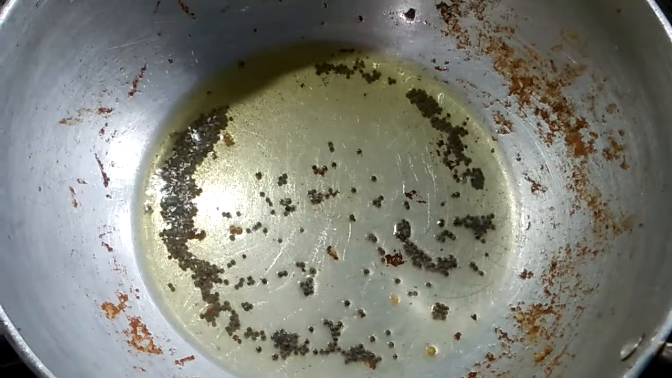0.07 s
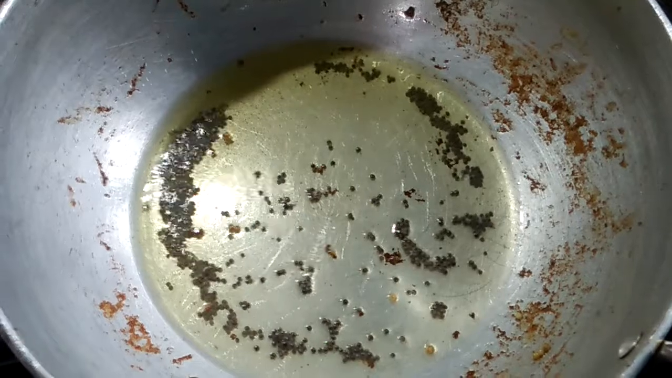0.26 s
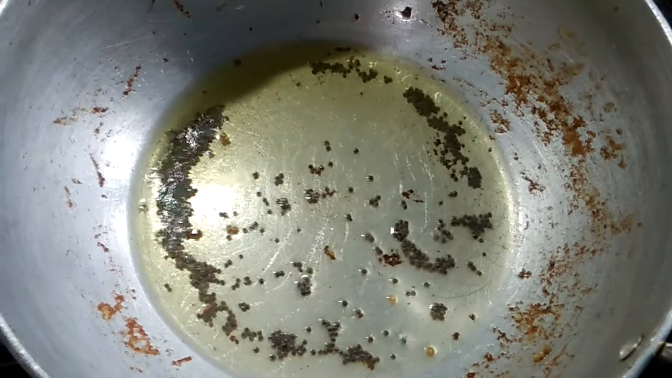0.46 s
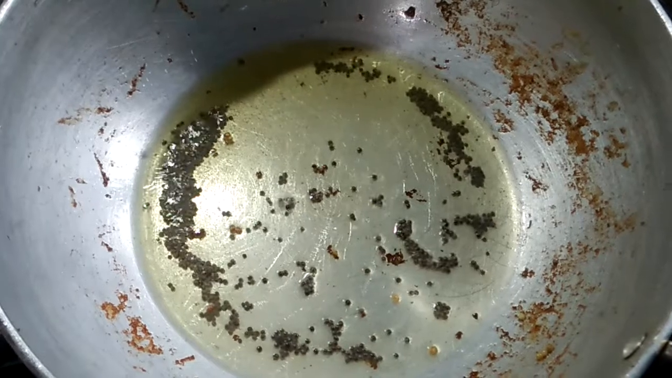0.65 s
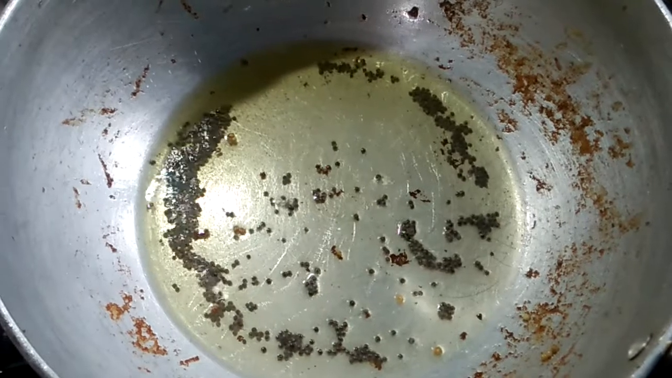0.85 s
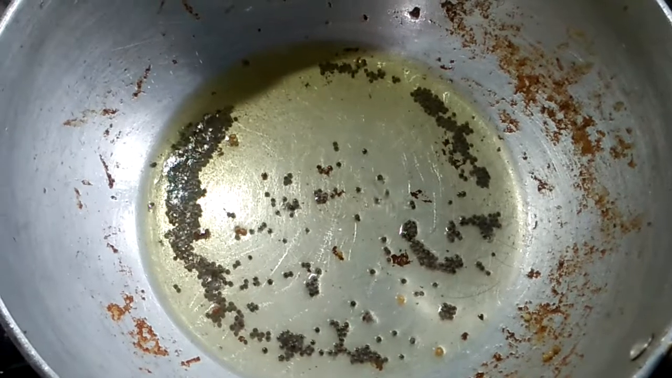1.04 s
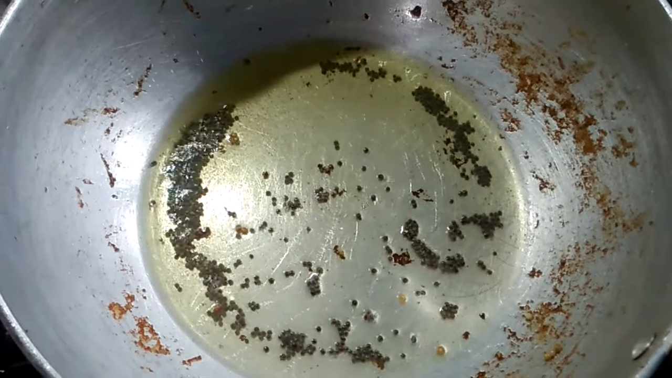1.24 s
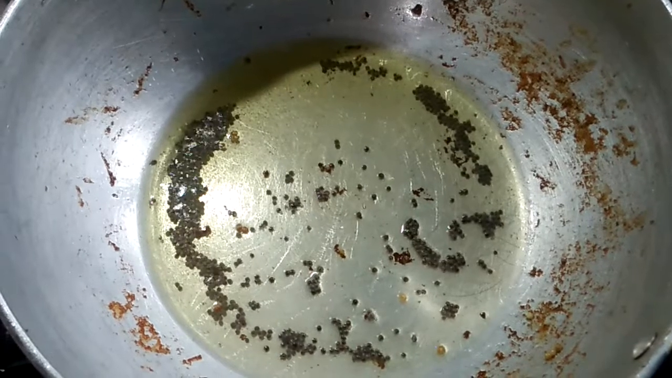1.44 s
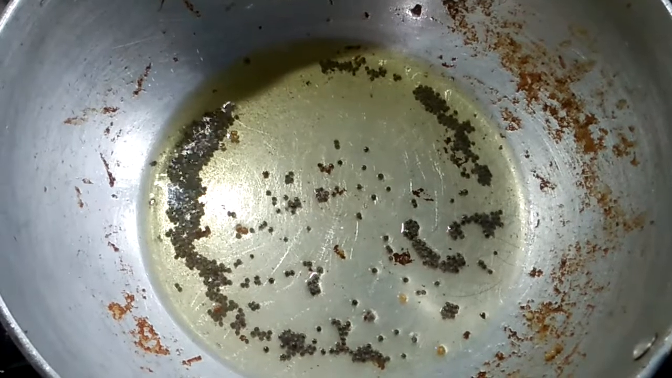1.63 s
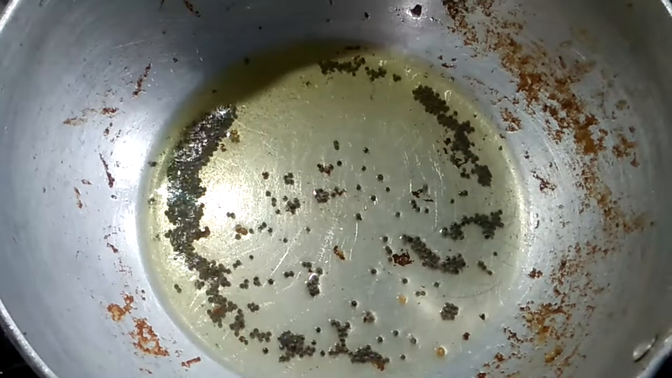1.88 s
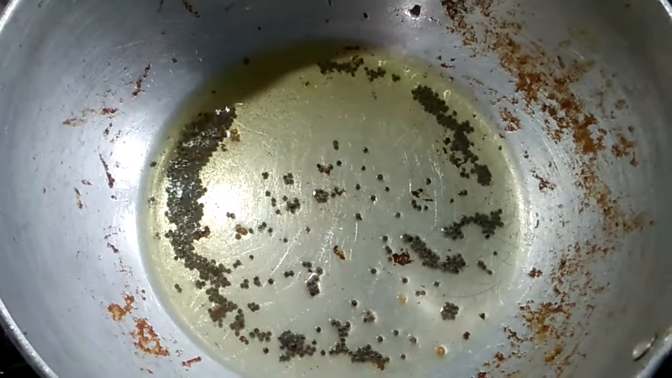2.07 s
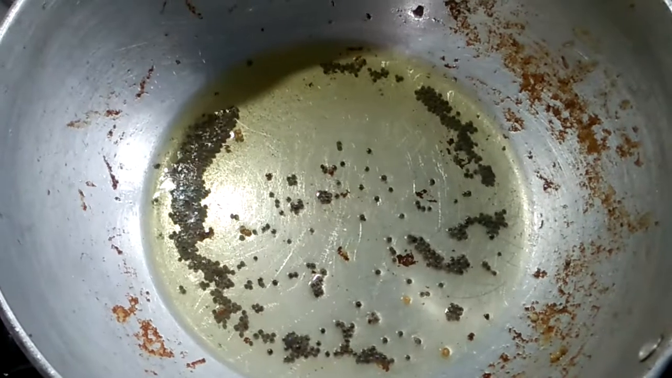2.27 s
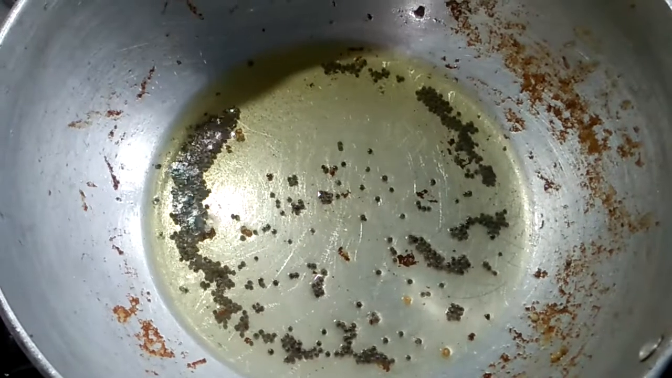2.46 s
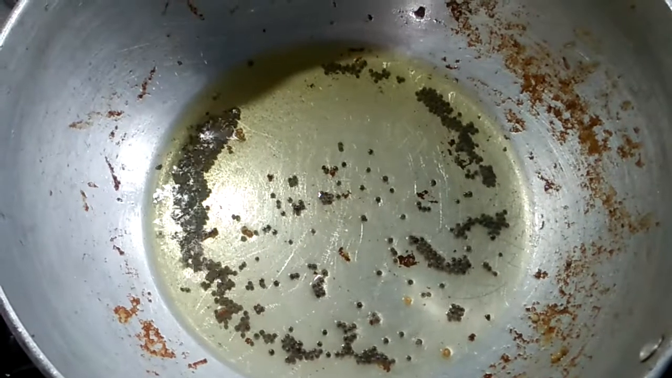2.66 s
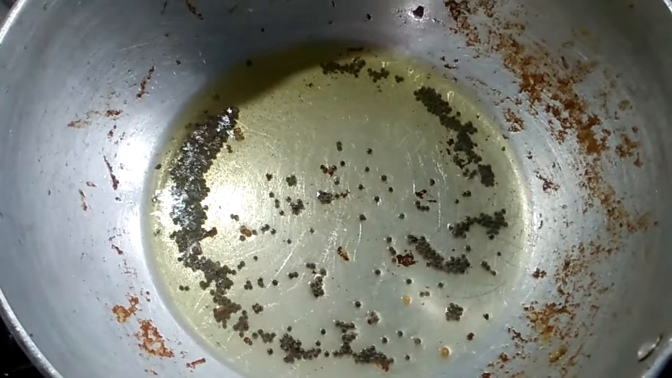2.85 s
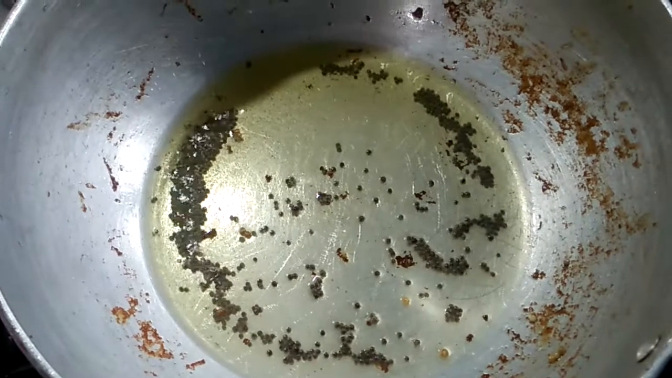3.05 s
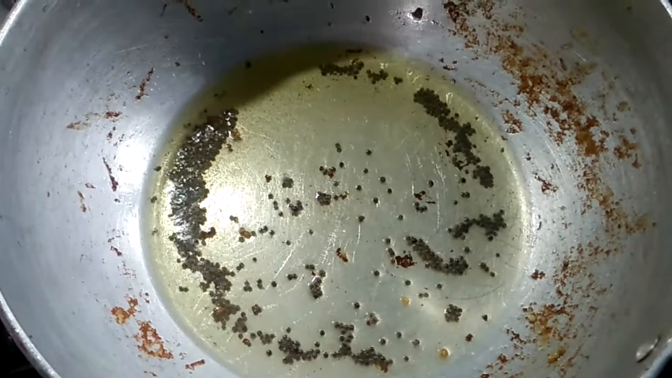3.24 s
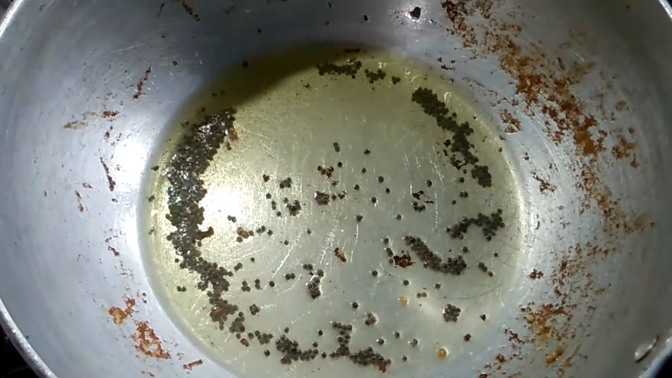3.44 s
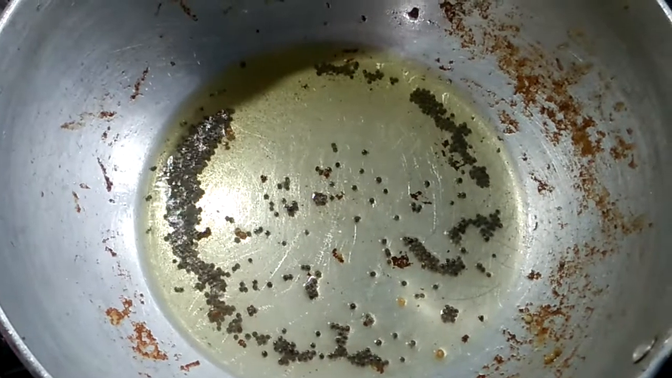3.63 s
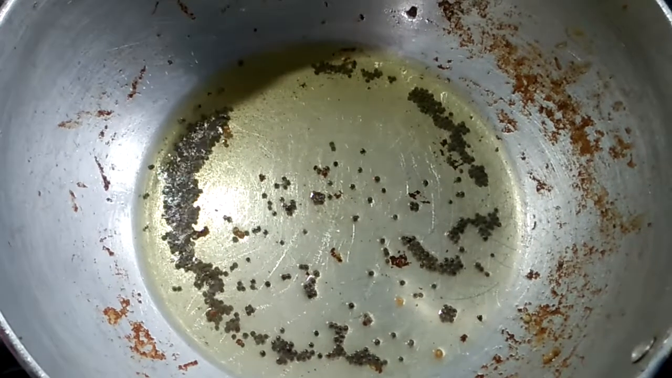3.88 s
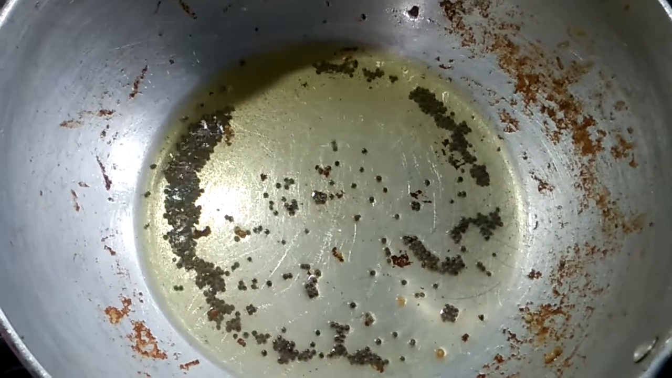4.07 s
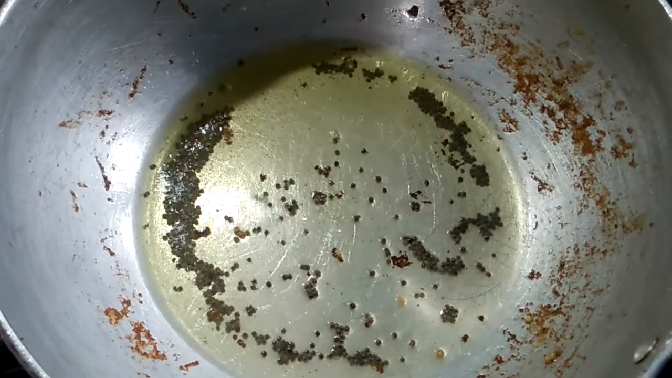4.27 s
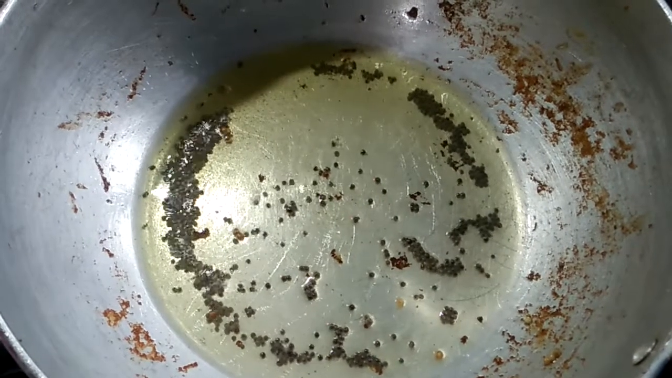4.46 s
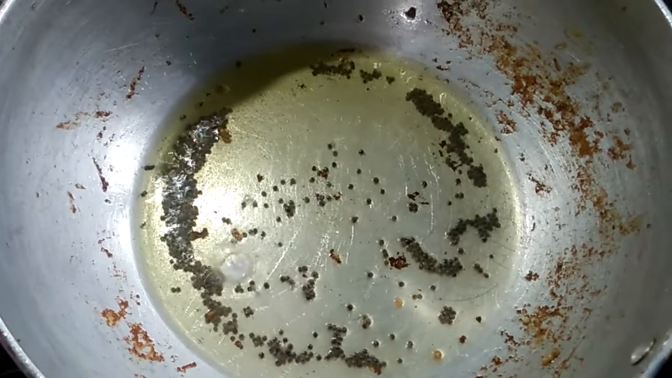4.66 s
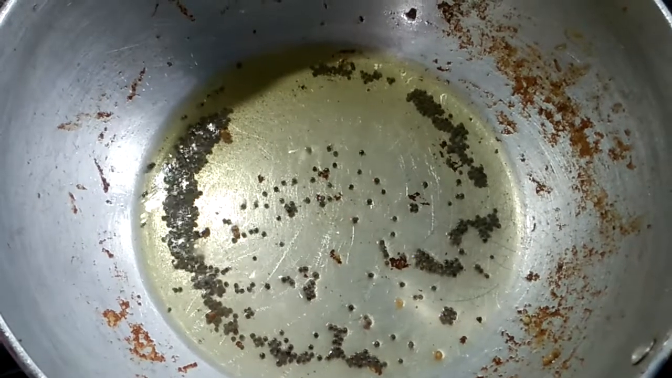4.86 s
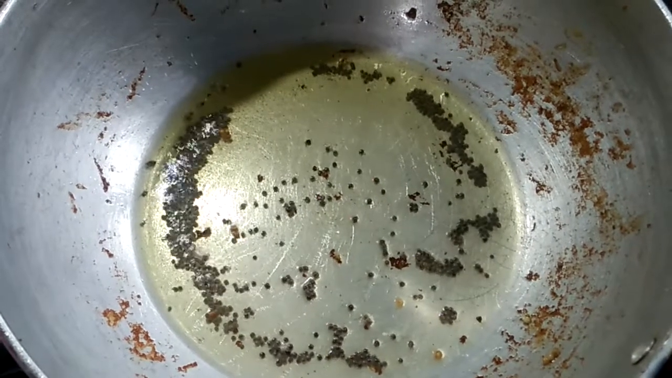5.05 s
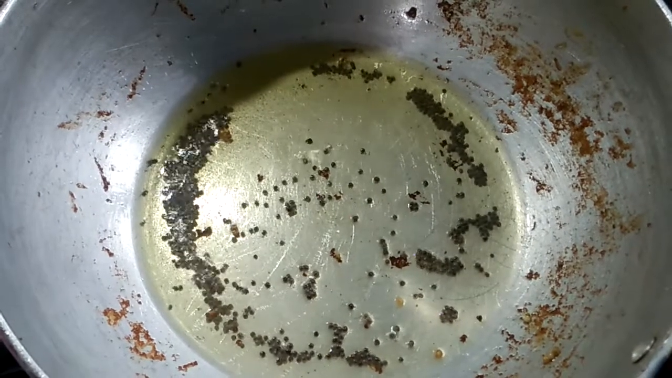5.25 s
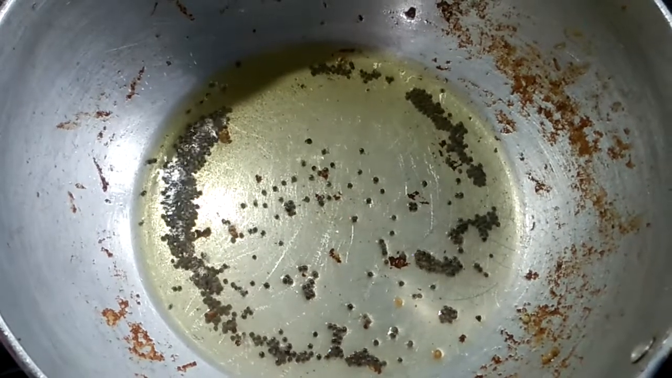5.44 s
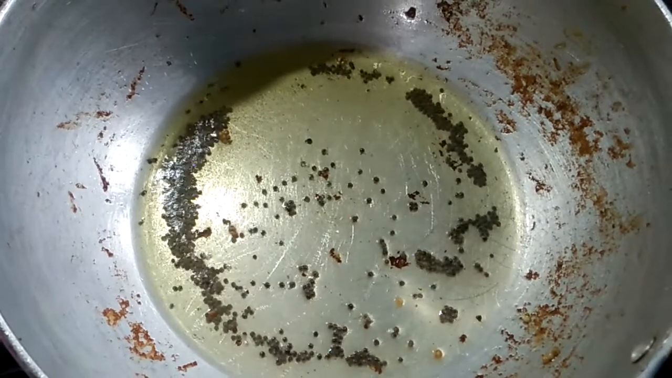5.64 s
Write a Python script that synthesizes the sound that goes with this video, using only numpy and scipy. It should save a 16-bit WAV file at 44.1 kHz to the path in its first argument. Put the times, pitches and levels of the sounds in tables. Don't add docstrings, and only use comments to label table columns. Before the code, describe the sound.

Irregular crisp pops and crackles of seeds spluttering in a steel pan of oil, with small steam spits and a faint fizz beneath.

```python
import sys
import numpy as np
from scipy import signal
from scipy.fft import rfft, irfft, next_fast_len
from scipy.io import wavfile
from scipy.ndimage import uniform_filter1d

SR = 44100
rng = np.random.default_rng(int(sys.argv[2]) if len(sys.argv) > 2 else 0)


def generate_wav(signal):
    frames = np.transpose(np.atleast_2d(signal))
    scaled = np.clip(frames, -1, 1) * 32767
    pcm = np.round(scaled).astype(np.int16)
    wavfile.write(sys.argv[1], SR, pcm)


def amplitude_ratio(level_db):
    exponent = np.asarray(level_db, float) / 20
    return 10 ** exponent


N = 251722
TIME = np.arange(N) / SR

# start in seconds, peak above 8 kHz in dB, then the shares of thump and of edge
# and the strength of the room, all in dB.
CRACKS = [(0.0667, -33.5, -46, -20, 6), (0.3077, -26.5, -31.5, -17, 0.5), (0.6547, -24, -17.5, -9.5, 0),
          (0.784, -24.5, -30.5, -15, 8), (0.8062, -18, -27.5, -20.5, -2.5), (1.078, -34.5, -27, -21, 5.5),
          (1.1706, -19.5, -34, -21.5, -1.5), (1.9177, -18, -24, -11, 3), (2.4461, -12, -26.5, -16.5, 5),
          (2.7327, -33, -48, -18.5, 3), (3.185, -36, -22.5, -21, 5), (3.6415, -27.5, -34.5, -21.5, 9),
          (4.363, -26.5, -29, -18.5, 3.5), (4.5352, -28, -28, -4.5, -3), (4.572, -18, -27, -15, 0),
          (4.7141, -13.5, -32, -19, -3), (4.7985, -6.5, -27, -16, 0.5), (4.9365, -11, -31.5, -15, -2.5),
          (5.2227, -19, -27, -11.5, -2), (5.4818, -38.5, -20.5, -16.5, 9), (5.672, -33, -20, -16.5, 4)]


def rms_one(x):
    return x / np.sqrt(np.mean(x ** 2, axis=-1, keepdims=True) + 1e-20)


def band(x, low_hz, high_hz, order=2):
    limits = [low_hz, min(high_hz, .45 * SR)]
    return signal.sosfilt(signal.butter(order, limits, "band", fs=SR, output="sos"), x)


def resonance(x, hz, width_hz):
    r = np.exp(-np.pi * width_hz / SR)
    turn = 2 * np.pi * hz / SR
    return signal.lfilter([(1 - r * r) / 2, 0, (r * r - 1) / 2], [1, -2 * r * np.cos(turn), r * r], x)


def ring(blows, hz, t60):
    r = amplitude_ratio(-60 / (t60 * SR))
    turn = 2 * np.pi * hz / SR
    return signal.lfilter([0, np.sin(turn)], [1, -2 * r * np.cos(turn), r * r], blows + 1e-18)


def fade(x, t60):
    return signal.lfilter([1], [1, -amplitude_ratio(-60 / (t60 * SR))], x + 1e-18)


def train(s, level_db):
    out = np.zeros(N + SR)
    np.add.at(out, (np.asarray(s) * SR).astype(int), amplitude_ratio(np.asarray(level_db)))
    return out[:N]


def drift(rate):
    knots = np.arange(0, N / SR + 1, 1 / rate)
    return np.interp(TIME, knots, np.clip(rng.standard_normal(len(knots)), -2, 2))


def shaped(spectrum, patchy_db, channels=2, count=9):
    hz, level_db = np.transpose(spectrum)
    edges = np.geomspace(hz[0], min(hz[-1], .45 * SR), num=count)
    white = rng.standard_normal((2, channels, N))
    out = 0
    for k, (low, high) in enumerate(zip(edges, edges[1:])):
        gain_db = np.interp(np.log(low * high) / 2, np.log(hz), level_db)
        out = out + amplitude_ratio(gain_db + patchy_db * drift(8.0)) * band(white[k % 2], low, high)
    return rms_one(out)


def humming(peaks, patchy_db):
    white = rng.standard_normal(N)
    out = 0
    for hz, width_hz, level_db in peaks:
        tone = resonance(resonance(white, hz, width_hz), hz, width_hz)
        out = out + amplitude_ratio(level_db + patchy_db * drift(9)) * rms_one(tone)
    return rms_one(out)


def gate():
    # start in seconds, fizz level in dB, hold in seconds, closing speed in dB per second.
    openings = [(0.0, -57, .005, 89), (0.064, -60, .005, 50), (0.307, -60.5, .005, 63),
                (.542, -64, .005, 114), (0.662, -63, .2, 28), (1.168, -59.5, .03, 77),
                (1.436, -64, 0.066, 106), (1.807, -66.5, .005, 33), (1.913, -62, .06, 117),
                (2.292, -66.5, .2, 22), (2.536, -62, .3, 8), (3.184, -63, .3, 16),
                (3.638, -60.5, 0.094, 109), (3.95, -79, .06, 99.5), (4.216, -63, .2, 8.5),
                (4.36, -59.5, .2, 18), (4.704, -57.5, .1, 26), (4.8, -59, 0.51, 27),
                (5.476, -63, .03, 43.5), (5.669, -64, .04, 52)]
    shut_floor_db = -86.5
    rows = np.array(sorted(openings))
    newest = np.maximum(np.searchsorted(rows[:, 0], TIME, side="right") - 1, 0)
    s, open_db, hold, closing = rows[newest].T
    return np.maximum(open_db - closing * np.maximum(TIME - s - hold, 0), shut_floor_db)


def fizz():
    # pitch in Hz, level in dB per Hz.
    hiss = [(1760, -28), (3000, -7.5), (5180, -5.5), (7100, -0.5), (10500, -3.5), (13700, -8.5),
            (14700, -8), (15000, -45)]
    born = rng.random(N) < 260 * amplitude_ratio(5 * drift(5)) / SR
    sizes = amplitude_ratio(3.5 * np.minimum(rng.exponential(1, N), 4)) * rng.choice([-1, 1], N)
    bubbles = rms_one(band(born * sizes + 1e-18, 5800, 26000))
    return shaped(hiss, patchy_db=2.8, count=17) + amplitude_ratio(-7) * bubbles * [[1], [0]]


def steam_whistle():
    # pitch in Hz, width in Hz, level in dB.
    gaps = [(6760, 48, -6.5), (7700, 95, -8.5), (9250, 150, -2.5), (11360, 88, -4.5), (12400, 60, -15.5),
            (5500, 90, -6.5), (8130, 70, -0.5), (11700, 58, -3.5), (13500, 130, -3), (3410, 90, -4)]
    return humming(gaps, patchy_db=5)


def burner(shut_db):
    # pitch in Hz, level in dB per Hz.
    roar = [(130, -47), (220, -16), (243, -9.5), (526, -9), (694, -2.5), (1700, -3.5), (2420, -9),
            (3160, -3), (4500, -25.5), (5850, -19), (9900, -120)]
    # pitch in Hz, width in Hz, level in dB.
    whistle = [(2390, 110, -9), (2600, 250, -6.5), (2430, 560, -9.5), (1187, 25, -16)]
    # time in seconds, level in dB.
    flame_size = [(0.0, -78), (0.3, -66.5), (0.5, -68.5), (0.83, -65), (1.1, -67), (1.5, -76), (1.85, -71),
                  (2.15, -82), (2.34, -89), (2.52, -60), (2.65, -63), (2.85, -64.5), (3.2, -64.5),
                  (3.86, -57.5), (4.08, -76), (4.6, -55.5), (4.77, -80), (4.9, -58.5), (5.71, -65)]
    size_db = np.interp(TIME, *np.transpose(flame_size))
    flame_db = -68.5 + 0.017 * (size_db - size_db.mean()) + 0.099 * (shut_db - shut_db.mean())
    whistle_db = size_db + 0.11 * shut_db
    out = amplitude_ratio(flame_db) * shaped(roar, patchy_db=3.5, channels=1)[0]
    return out + amplitude_ratio(whistle_db - 3.5) * humming(whistle, patchy_db=3)


def rumble():
    # pitch in Hz, width in Hz, level in dB.
    rumble_tones = [(57.8, 37, 0.5), (97, 20.7, 1.5), (115.8, 16, -5), (140.5, 60, -11.5), (71.5, 42, -14)]
    # pitch in Hz, width in Hz, level in dB.
    drone_tones = [(167.9, 14.5, -4), (190.3, 6, -5.5)]
    # middle in seconds, rumble in dB, drone in dB, half length in seconds.
    swells = [(0.0, -61.5, -64, 0.047), (0.206, -59, -78, 0.086), (0.46, -66, -84, 0.13),
              (1.06, -68.5, -82.5, 0.38), (1.75, -64, -81.5, 0.11), (2.017, -64, -77, 0.13),
              (2.34, -67.5, -75, 0.15), (2.786, -69, -69, 0.2), (3.037, -60, -67, 0.056),
              (3.153, -74, -67.5, 0.057), (3.49, -68, -68, 0.14), (3.71, -58, -80, 0.16),
              (4.041, -64.5, -75, 0.095), (4.37, -71, -71.5, 0.09), (4.552, -62, -92, 0.051),
              (4.712, -66, -95, .04), (4.84, -65.5, -77, 0.17), (5.26, -74.5, -79, 0.11),
              (5.543, -65.5, -92, 0.09)]
    s, rumble_db, drone_db, half = np.transpose(swells)
    bells = np.exp(-((TIME - s[:, None]) / half[:, None]) ** 2)
    rumble_gain = amplitude_ratio(-85.5) + amplitude_ratio(rumble_db) @ bells
    drone_gain = amplitude_ratio(-90.5) + amplitude_ratio(drone_db) @ bells
    return rumble_gain * humming(rumble_tones, patchy_db=5.0) + drone_gain * humming(drone_tones, patchy_db=2.5)


def bursts():
    # start in seconds, peak above 8 kHz, share of thump, share of edge, all in dB.
    ticks = [(0.542, -45.5, -15, -9.5), (0.911, -52, -14, 1.5), (2.292, -52, -49.5, -9),
             (2.3, -47.5, -10, -4), (2.7789, -50, -24, 4.5), (2.91, -43, -37, -32), (3.3674, -42, -33, -27),
             (4.2228, -42, -17.5, -1.5), (4.6615, -35, -53, -19), (5.1771, -39, -39, -15),
             (5.198, -38, -39, -22)]
    # start in seconds, peak above 8 kHz, thump, edge, all in dB.
    blurts = [
        (0.7047, -38.5, -9.5, -17),
        (1.8096, -58.5, -0.5, 3.5),
        (2.6246, -45.5, -8.5, 4),
        (4.752, -47, 3, -16),
    ]
    dry_body_db, dull_body_db = -2.5, 8
    tick_room_db, dull_room_db = -3.5, 2.5
    rows = [(*row, dry_body_db) for row in CRACKS]
    rows += [(*row, tick_room_db, dry_body_db) for row in ticks]
    rows += [(*row, dull_room_db, dull_body_db) for row in blurts]
    s, peak_db, thump_db, edge_db, room_db, lift_db = np.transpose(sorted(rows))
    s = s + .0012
    body_db = (thump_db + edge_db) / 2 + lift_db
    return s, peak_db, thump_db, body_db, edge_db, room_db


def cracks():
    # low Hz, high Hz, click in dB, tail in dB, early and late fading time (t60) in seconds.
    crack_bands = [
        (582, 1703, 19.5, -11, 0.13, 0.79),
        (1393, 4140, 13, -8.5, 0.18, 0.66),
        (3630, 8920, 13, -9.5, 0.12, 0.49),
        (8120, 13200, 21, -13, 0.17, 0.52),
        (12720, 16500, 19, -16, 0.12, 0.5),
    ]
    # delay in seconds, level in dB.
    echo_paths = [
        (.0023, -13),
        (.0045, -20),
    ]
    # time in seconds, peak above 8 kHz in dB.
    slaps = [(0.315, -33), (0.665, -41), (0.7927, -40), (0.8144, -23), (1.176, -33), (1.9285, -27),
             (2.306, -69), (2.4544, -17), (2.7425, -41), (3.1934, -48), (4.23, -47), (4.3714, -26),
             (4.544, -29), (4.7224, -25), (4.8087, -13), (4.9462, -17), (5.2305, -22), (5.68, -57),
             (3.6505, -30), (4.5803, -27), (5.2075, -44), (4.9485, -25), (2.4575, -19), (5.5, -53)]
    smeared, sharp, smear_s = .24, .14, .004
    s, peak_db, *shares_db, room_db = bursts()
    shares_db += [np.full(len(s), -15), np.full(len(s), -14.5)]
    luck = rng.standard_normal((len(s), 4))
    slap_s, slap_db = np.transpose(slaps)
    parent = np.searchsorted(s, slap_s - .004) - 1
    direct, tail = np.zeros(N), np.zeros((2, N))
    unit = signal.unit_impulse(2000)
    rough, white = rng.choice([-1, 1], N), rng.standard_normal((2, N))
    for (low, high, click_db, tail_db, early, late), share_db in zip(crack_bands, shares_db):
        level_db = peak_db + share_db
        echoes = train(slap_s + 0.00074, slap_db + share_db[parent] - 3.5)
        for k, (lag, echo_db) in enumerate(echo_paths):
            arrival = s + lag * (1 + 0.18 * luck[:, k])
            echoes += train(arrival, level_db + echo_db + room_db + 3 * luck[:, k + 2])
        echoes = smeared * fade(echoes, smear_s * 3) * rough - sharp * echoes
        clicks = band(train(s, level_db) + echoes + 1e-18, low, high, order=3)
        direct += amplitude_ratio(click_db) * clicks / np.linalg.norm(band(unit, low, high, order=3))
        fed = train(s + 0.00014, level_db + tail_db + room_db)
        swell = fade(fed, early) + amplitude_ratio(-13.5) * fade(fed, late)
        tail += swell * rms_one(band(white, low, high, order=3))
    return direct, tail


def pan_ring():
    # pitch in Hz, level in dB, fading time (t60) in seconds.
    pan_tones = [(953, -12.5, 0.33), (694, -17, 0.3)]
    s, peak_db, thump_db, *_ = bursts()
    return sum(ring(train(s, peak_db + thump_db + level_db), hz, t60) for hz, level_db, t60 in pan_tones)


def jets():
    # start in seconds, peak in dB, pitch in Hz, fading time (t60) in seconds.
    sudden_spits = [(0.2, -50.5, 2730, 0.25), (0.6629, -27.5, 3000, 0.09), (0.7066, -26.5, 1943, 0.18),
                    (0.7062, -28.5, 2780, 0.19), (0.923, -41, 3020, 0.088), (1.4405, -41, 1640, 0.1),
                    (1.8121, -33.5, 3790, 0.17), (2.545, -35.5, 2850, 0.18), (2.6259, -20, 2860, 0.2),
                    (2.628, -32.5, 3760, 0.24), (2.6, -47, 2800, 0.12), (3.3, -45, 3660, 0.1),
                    (4.289, -49.5, 3130, 0.24), (4.7531, -28, 2520, 0.19), (5.4825, -42.5, 2660, 0.29),
                    (5, -47, 4430, 0.1), (4.502, -45, 4600, 0.14), (5.434, -39.5, 4900, 0.099),
                    (4.537, -32.5, 5300, 0.12), (0.657, -33.5, 3850, 0.19)]
    sprays = [(0.0676, -30.5, 4670, 0.17), (1.0764, -33.5, 5580, 0.14), (2.308, -42, 580, 0.1),
              (2.545, -43, 4670, 0.25), (4.3, -57, 450, .5), (4.5437, -41, 4560, 0.091),
              (5.429, -47.5, 6500, .1), (1.4406, -63, 8860, 0.23), (5.675, -37.5, 8500, 0.36),
              (2.371, -51, 1450, .6), (2.381, -53, 850, .5), (2.436, -45, 800, .1)]
    leaks = [(1.4385, -36, 6820, 0.25), (1.443, -41, 9800, 0.33), (1.4411, -52, 13000, 0.42),
             (2.962, -37.5, 7700, 0.14), (2.97, -45, 9300, .25), (2.97, -47.5, 12400, 0.25),
             (3.37, -50, 12500, 0.25), (3.448, -53, 410, 0.27), (4.469, -48, 13500, 0.22),
             (5.04, -46, 9600, .15), (2.9, -45.5, 13000, 0.18)]
    moans = [(1.391, -53, 325, .28), (3.931, -56, 1720, .47), (3.921, -56.5, 1070, .73),
             (3.111, -49, 2366, .3), (3.501, -52, 2386, .4), (3.731, -47, 2366, .4), (3.901, -52, 2381, .4),
             (3.801, -51, 2731, .25), (3.941, -51, 2681, .3), (3.421, -54, 2701, .3),
             (0.781, -56.5, 2000, 1.8), (4.299, -52, 830, .22)]
    squeals = [
        (2.312, -53.5, 1880, 0.67),
        (2.362, -37.5, 1940, 0.19),
        (2.378, -44, 1170, 0.5),
        (2.386, -38, 2080, .15),
        (2.398, -37.5, 2010, 0.2),
        (2.418, -33, 2060, 0.1),
        (2.431, -38.5, 1985, 0.13),
        (1.41, -57.5, 1590, 1),
        (2.64, -40.5, 5700, 0.15),
    ]
    peeps = [(1.761, -49, 4461, .2), (1.763, -53, 2901, .2), (1.763, -55, 5351, .2),
             (1.813, -52, 5501, .25), (0.1781, -39, 2401, .12), (0.1891, -35, 3001, .08),
             (2.773, -42, 2561, .1), (2.787, -41, 2901, .1), (2.391, -47, 2701, .2),
             (2.421, -54, 2901, .15), (2.399, -33, 2061, .3), (2.363, -39, 2001, .06)]
    # width as share of the pitch, rise in seconds, knock in dB, lingering part in dB.
    kinds = [
        (0.25, 0.00174, -6, -14.5),
        (0.44, 0.00037, -13, -16),
        (0.19, 0.021, -45, -18),
        (0.051, 0.027, -45, -12),
        (.2, 0.0043, -49, -13.5),
        (0.071, .003, -49.5, -15),
    ]
    out = np.zeros((2, N + SR))
    t = TIME[:SR // 4]
    unit = signal.unit_impulse(800)
    ending = np.cos(np.clip(t / t[-1] * 2 - 1, 0, 1) * np.pi / 2) ** 2
    groups = [sudden_spits, sprays, leaks, moans, squeals, peeps]
    for rows, (share, rise, knock_db, late_db) in zip(groups, kinds):
        for s, peak_db, hz, t60 in rows:
            half_width = share * hz / 2
            gusts = np.repeat(rng.standard_normal(len(t) // 100 + 1), 100)[:len(t)]
            puffs = rng.standard_normal((2, len(t))) * amplitude_ratio(2.15 * gusts)
            jet = rms_one(band(puffs, max(hz - half_width, 50), hz + half_width, order=4))
            fall = amplitude_ratio(-75 * t / t60) + amplitude_ratio(late_db - 28 * t / t60)
            shape = np.minimum(t / max(rise, 1e-4), 1) * fall * ending
            knock = band(unit, .65 * hz, 1.15 * hz)
            at = int(s * SR)
            out[:, at:at + len(t)] += amplitude_ratio(peak_db - 10.5) * jet * shape
            out[0, at:at + len(unit)] += amplitude_ratio(peak_db + knock_db) * knock / np.max(np.abs(knock))
    return out[:, :N]


def plops():
    # start in seconds, level in dB, pitch in Hz, fading time (t60) in seconds.
    bubble_rings = [(0.7056, -20, 1850, .014), (0.7056, -24, 2450, .016), (0.7056, -29, 1200, .014),
                    (0.7181, -33, 2951, .03), (4.7526, -32, 2151, .02), (4.7556, -36, 2651, .03),
                    (0.0679, -34, 5201, .01), (0.0703, -33, 4301, .012), (1.0776, -38, 5301, .012),
                    (2.4476, -28, 1301, .02), (2.3151, -45, 561, .04), (2.6256, -29, 2701, .015),
                    (0.6581, -32, 3001, .01)]
    out, unit = np.zeros(N), signal.unit_impulse(2000)
    for s, level_db, hz, t60 in bubble_rings:
        at = int(s * SR)
        out[at:at + len(unit)] += amplitude_ratio(level_db) * band(ring(unit, hz, t60), .65 * hz, 1.4 * hz)
    return out


def pings():
    # start in seconds, level in dB, pitch in Hz, fading time (t60) in seconds.
    strikes = [
        (4.947, -52, 4221, .5),
        (4.947, -53, 4260, .3),
        (4.947, -56, 3553, .32),
        (4.947, -45, 3838, .13),
        (1.927, -48, 5206, .15),
        (1.927, -52, 4011, .24),
        (1.927, -52, 2083, .2),
        (1.18, -56, 2740, .25),
        (4.862, -46, 2950, .08),
    ]
    return sum(ring(train([s], [level_db + 0.28]), hz, t60) for s, level_db, hz, t60 in strikes)


def width(diffuse):
    hush_s = .026
    starts = np.array(CRACKS)[:, 0]
    middles = train(np.maximum(starts + .005 - hush_s / 2, 0), np.zeros(len(starts)))
    heard = diffuse * (uniform_filter1d(middles, size=int(hush_s * SR)) < 1e-6)
    edges = np.geomspace(6700, 13500, num=7)
    out = 0
    for low, high in zip(edges, edges[1:]):
        patch_open = np.clip(3 * (drift(22) + .35), 0, 1)
        out = out + patch_open * band(heard, low, high, order=3)
    return amplitude_ratio(-2.5) * out


def scene():
    fizz_db = gate()
    shut_db = uniform_filter1d(fizz_db, size=2000) - fizz_db.max()
    floor = amplitude_ratio(fizz_db - 11.0) * steam_whistle() + burner(shut_db) + rumble()
    clicks, tail = cracks()
    direct = clicks + pan_ring() + plops() + pings()
    diffuse = tail + jets() + amplitude_ratio(fizz_db - 4.5) * fizz()
    mid = direct + diffuse[0] + floor
    side = width(diffuse[1])
    return np.array([mid + side, mid - side])


def low_pass(x):
    return signal.sosfilt(signal.butter(12, 16650, fs=SR, output="sos"), x)


def record(dry):
    bright = dry + 1.23 * resonance(dry, 15660, 3100)
    size = next_fast_len(N)
    hz = np.fft.rfftfreq(size, 1 / SR)
    step = np.sin(np.clip((hz - 14200) / 350, 0, 1) * np.pi / 2) ** 2
    cut = irfft(rfft(bright, size) * amplitude_ratio(-56 * step), size)[:, :N]
    top = band(bright - cut, 13000, 15600)
    jump = uniform_filter1d(top ** 2, size=150) / (uniform_filter1d(top ** 2, size=3000) + 1e-14)
    sudden = np.clip(jump / 7 - 1, 0, 1) * top
    mix = cut + amplitude_ratio(-22) * band(sudden, 13500, 16100, order=8)
    return low_pass(mix)


dry = scene()
out = record(dry)
generate_wav(out)
```